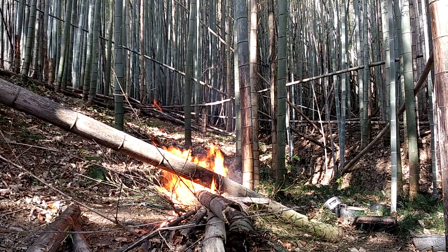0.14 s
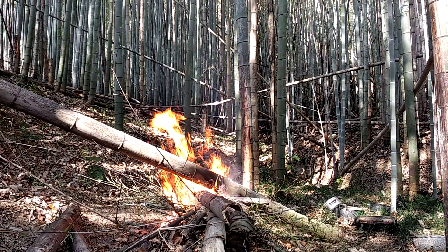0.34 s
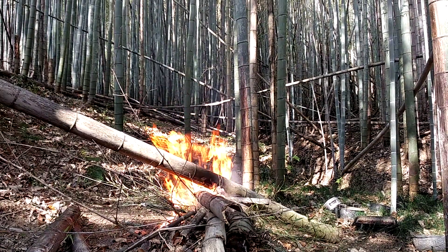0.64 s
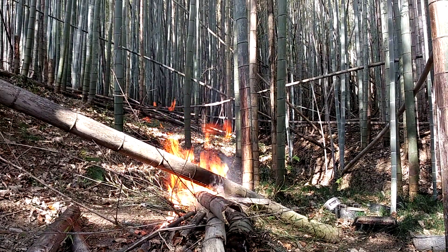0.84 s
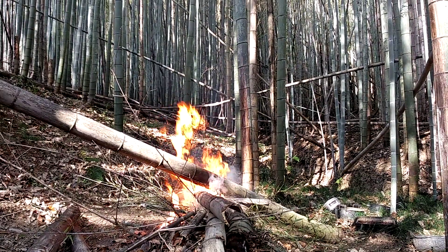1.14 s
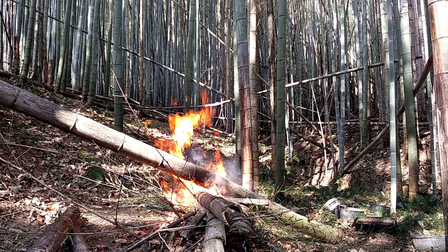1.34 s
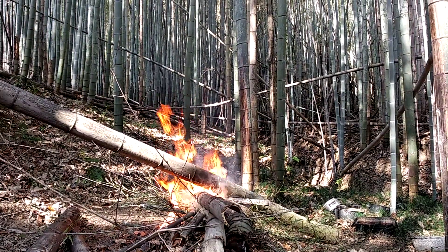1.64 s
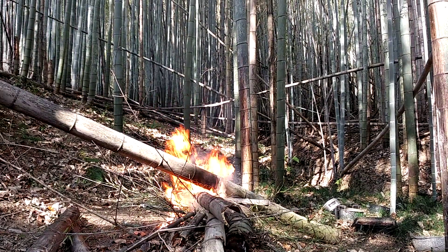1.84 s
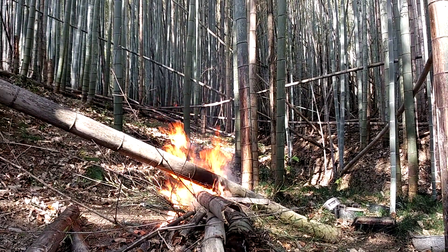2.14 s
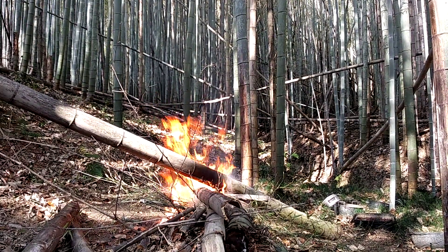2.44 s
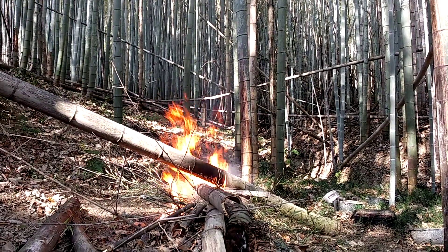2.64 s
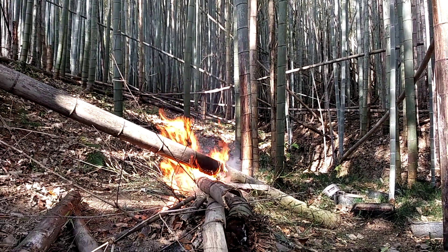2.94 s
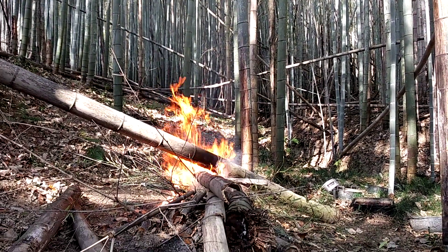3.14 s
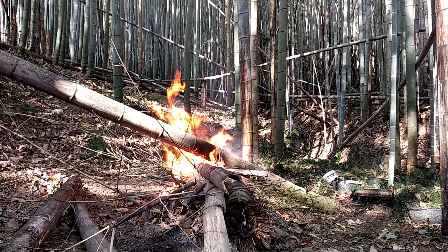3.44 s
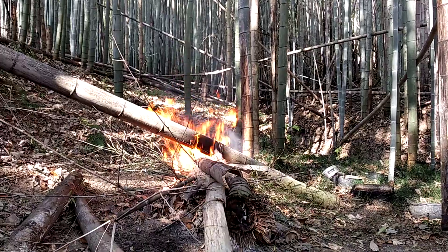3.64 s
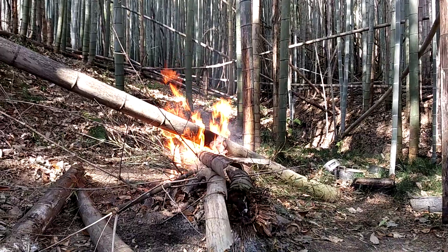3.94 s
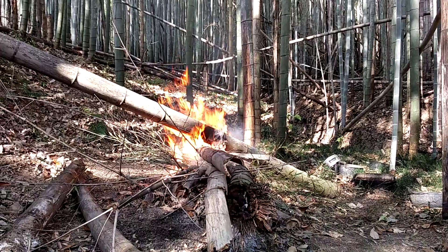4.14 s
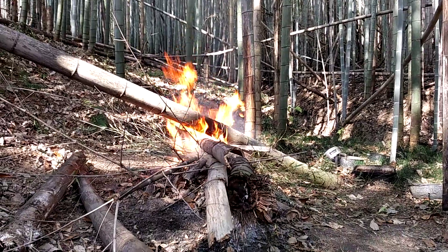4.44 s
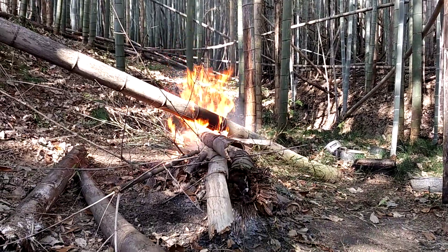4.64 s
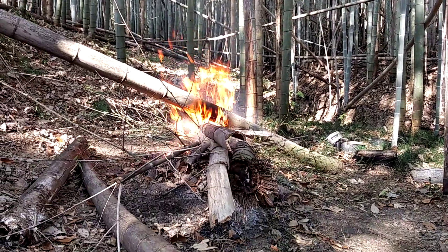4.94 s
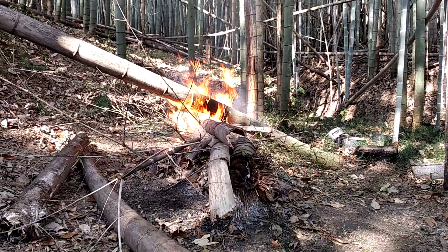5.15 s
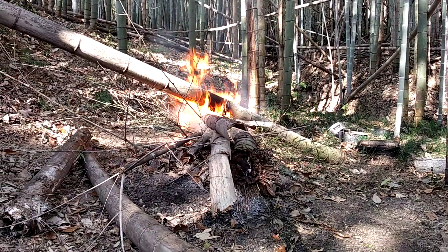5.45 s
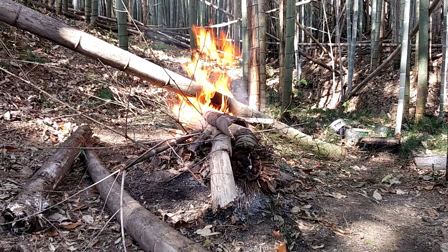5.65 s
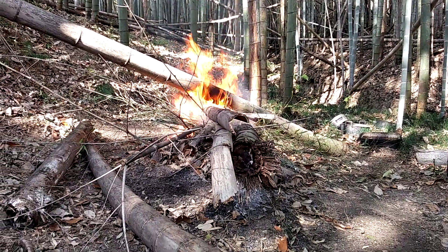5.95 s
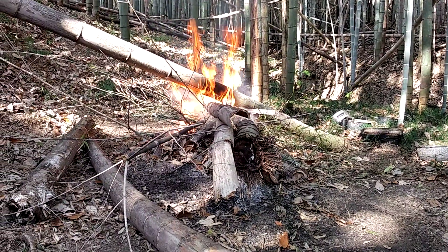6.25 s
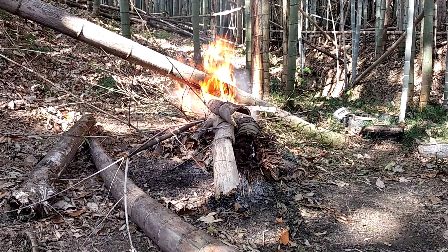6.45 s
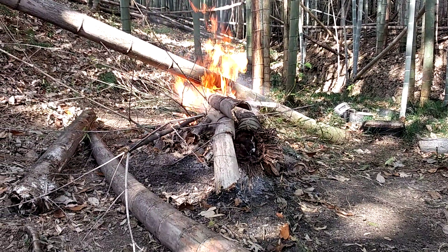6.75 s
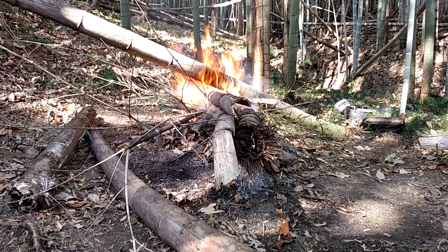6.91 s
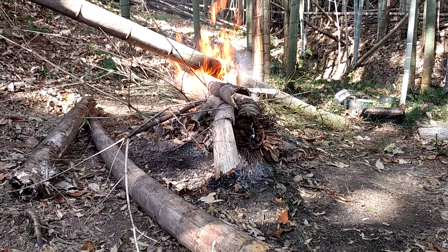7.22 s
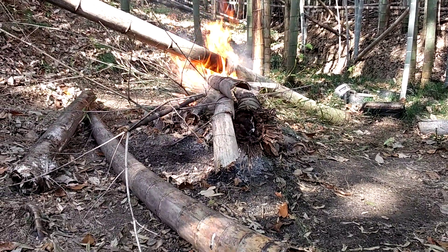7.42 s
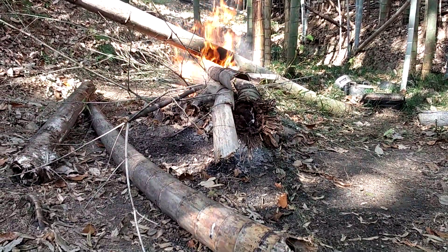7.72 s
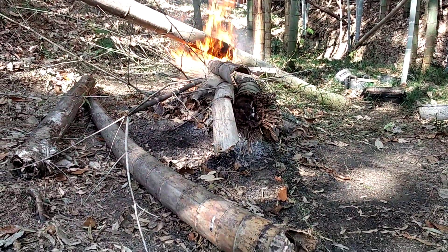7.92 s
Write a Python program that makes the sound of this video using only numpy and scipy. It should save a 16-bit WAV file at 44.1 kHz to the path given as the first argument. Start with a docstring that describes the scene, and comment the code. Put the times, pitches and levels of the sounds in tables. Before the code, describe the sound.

Close dry snaps, ticking embers and brief steam hisses over quiet rumbling flames outdoors, one hard bang near the start, a distant bird chirping.

```python
"""In a dense grove, a bonfire of bamboo poles burns a few metres away.
Flames rumble and gas hisses (shaped noise), while embers crackle and tick (tiny bursts and short tones).
Fibres snap in sharp pops (noise with a ring), splits let out spurts of steam (fading noise) and squeaks,
a thick cane thumps, and one sealed cane bursts (tones that die fast).
The standing stalks scatter the cracks as echoes, and a distant bird whistles three times (bent tones)."""
import sys
import numpy as np
from scipy import signal
from scipy.fft import rfft, irfft, next_fast_len
from scipy.io import wavfile
from scipy.ndimage import uniform_filter1d, minimum_filter1d

SR = 44100
rng = np.random.default_rng(int(sys.argv[2]) if len(sys.argv) > 2 else 0)


def generate_wav(sig):
    """Save sig (samples, or channels by samples) to the path in sys.argv[1] as 16-bit PCM at SR."""
    pcm = np.round(np.clip(np.atleast_2d(sig).T, -1, 1) * 32767).astype(np.int16)
    wavfile.write(sys.argv[1], SR, pcm)


N = 356239  # length of the scene in samples

# Bird whistles: (time [s], length [s], top pitch [Hz], level at the start [dB])
WHISTLES = [(2.335, 0.072, 4570, -45.5), (4.134, 0.092, 4630, -51), (6.396, 0.13, 4600, -50)]
# Every whistle climbs to its top, then hooks down: shares of the top pitch, and when the top comes (share of length)
CLIMB, HOOK, TOP_AT = 0.26, 0.107, 0.73
WHISTLE_ATTACK_S, WHISTLE_RELEASE_S, WHISTLE_SAG_DB_PER_S = 0.017, 0.01, -62

# Tone of the roaring flames: (frequency [Hz], relative level [dB])
ROAR_COLOUR = [(20, -48), (30, -31), (42, -7), (60, 0), (85, 1), (130, -2), (205, -6), (300, -18.5),
               (410, -18), (540, -31.5), (800, -49)]
# Tone of the escaping gas, before the canes colour it: (frequency [Hz], relative level [dB])
HISS_COLOUR = [(300, -8.5), (660, -3), (840, 0.5), (1100, -4.5), (1450, -7), (2100, -4.5), (3100, -7),
               (4300, 2), (5500, 1), (6200, -11), (7000, -10.5), (8900, -7), (12000, -11), (16000, -12.5)]
# Loudness of the roar and hiss, with the irregular wavering of their noise:
# (time [s], roar level [dB], hiss level before flicker [dB])
ROAR_AND_HISS_LEVELS = [(0.0, -48, -54), (0.99, -48.5, -53.5), (1.01, -46, -51), (1.6, -49, -54.5),
                        (1.64, -46.5, -55), (2.38, -48, -54), (2.92, -47.5, -52.5), (3.4, -44, -53.5),
                        (3.49, -52, -51), (3.53, -47, -53), (4.0, -49, -55), (4.72, -48, -52.5),
                        (4.77, -46, -52.5), (4.99, -49, -53.5), (5.26, -46, -53.5), (5.29, -49, -54.5),
                        (5.96, -46.5, -54), (8.08, -47.5, -53.5)]
# Resonances of the open canes: (frequency [Hz], width [Hz], level [dB])
HOLLOWS = [(834, 110, -12), (2086, 200, -6), (2763, 107, 2), (3360, 126, -3), (4820, 140, -12)]

# Frequency bands of snaps and crackle: (low edge [Hz], high edge [Hz])
SNAP_BANDS = [(250, 1150), (1300, 2500), (2650, 5500), (6600, 11000), (11000, 16500)]
# Relative level of the crackle in each of those bands [dB]
CRACKLE_BAND_DB = [-7.0, -6, -0.5, -7.0, -3.5]

# When the steam squeaks may begin: (earliest [s], latest [s])
SQUEAK_SPAN = (4.49, 4.69)
# Thin squeaks of steam forced through pores: (lowest start pitch [Hz], highest start pitch [Hz], level [dB])
SQUEAKS = (11100, 13400, -65)
# Steam from fresh splits: (time [s], level [dB], time to fall 60 dB [s], treble against body [dB])
SPURTS = [(.603, -48, .11, -18), (1.062, -34, 0.14, 3), (1.957, -38.5, 0.12, 1), (2.205, -45, 0.15, 4),
          (2.61, -34, 0.14, 6), (3.388, -37, 0.16, -21), (4.315, -42, 0.12, 0), (5.896, -41, 0.07, -9),
          (6.307, -40.5, 0.089, 1), (6.8, -49.5, 0.22, 4), (7.397, -45, 0.12, 7)]
# Tone of the steam, main part: (frequency [Hz], relative level [dB])
STEAM_BODY = [(200, -5), (800, -11), (1600, -8.5), (2800, -9), (4600, 3.5), (5600, 2), (6400, -12), (12000, -37)]
# Tone of the steam, treble part: (frequency [Hz], relative level [dB])
STEAM_TREBLE = [(4000, -30), (6200, -30), (7500, 3), (9200, 10.5), (11000, 3), (13000, 8), (16000, -5)]

# Dull thump of a thick cane: (level [dB], lowest [Hz], highest [Hz], time to fall 60 dB [s])
THUMP = (-33, 150, 518, 0.06)
THUMP_S = 3.387

# Snapping fibres: (time [s], level [dB], body below 2.5 kHz [dB], brightness above 6 kHz [dB],
# length [s], ringing pitch [Hz])
POPS = [(0.134, -38, -22, -8, 0.0032, 5500), (0.2545, -44.5, -0.5, -6, 0.0042, 4200),
        (0.327, -42.5, -4, -12, 0.0036, 5100), (0.497, -44.5, -11, -6, .0036, 4220),
        (.5626, -47, -5, -3, 0.0041, 5170), (.6013, -26, -1.5, -11, 0.0022, 4330),
        (.631, -48, 5, 4, .0047, 5120), (0.648, -43.5, -15, 3, 0.0021, 4630),
        (0.699, -46.5, -6, -8, .0036, 4500), (.7604, -39.5, -4.5, -6, 0.0041, 1970),
        (.902, -42.5, -8, -1, 0.0092, 4400), (0.968, -41, -19, -13, 0.0033, 4500),
        (0.985, -44.5, -14, 0, .0025, 4540), (1.036, -47.5, -1, 4, .0026, 4390),
        (1.0607, -27, -13, -3, 0.0027, 7730), (1.0637, -35, -11, 7.5, 0.0012, 12200),
        (1.076, -40, -9, 6, 0.0039, 7200), (1.0866, -39, -8, 0, .005, 4600),
        (1.308, -40.5, -8, -7, 0.0064, 5050), (1.3706, -46.5, -4, 0, 0.0028, 4970),
        (1.6306, -41, -10, -18, 0.002, 4440), (1.956, -29, -14, 4, 0.0029, 5330),
        (2.0358, -36.5, -13, 3.5, 0.0016, 4560), (2.203, -46.5, -1, 4, .006, 5300),
        (2.2133, -49, -10, 2, .004, 8030), (2.3146, -37, -10, -2, 0.0036, 2030),
        (2.3467, -44, -10, 6, 0.0018, 4000), (2.4159, -45, -13, 1, .0013, 8750),
        (2.465, -41.5, 0.5, -4, .0036, 4200), (2.6101, -37.5, -7.5, 1, .0036, 9400),
        (2.624, -35.5, -15, 4.5, 0.00078, 12000), (2.9615, -44, -1, -4, 0.0091, 4120),
        (2.978, -41, -15, -5, 0.0023, 4170), (3.008, -42.5, -18, -3, .0025, 4900),
        (3.0743, -43, 1, -2, 0.0072, 3950), (3.196, -41, -1, 2.5, 0.0071, 4110),
        (3.2575, -43, -12, 2, 0.0011, 4970), (3.3871, -28.5, 2, -4.5, 0.0026, 4260),
        (3.391, -34, -3, -9, 0.0045, 4080), (3.401, -36, -2, -6, .006, 2870),
        (3.444, -44, -3, -11, .0043, 4300), (3.4726, -26, -9, -5, 0.0036, 1860),
        (3.561, -42.5, -6, -6, .0056, 4570), (3.6258, -39, -2.5, -9, .0038, 4170),
        (3.79, -44, -4, -6, 0.0039, 4930), (3.824, -42.5, -4, -4, 0.003, 2230),
        (3.919, -42, -16, -4, .0023, 5070), (4.3126, -30.5, -6.5, 2, 0.0026, 4840),
        (4.3937, -42, 2, -12, 0.0047, 4180), (4.7714, -42.5, -11, -20, 0.0019, 4350),
        (4.843, -50.5, -12, 6, .0014, 2880), (4.977, -48.5, -15, 4.5, 0.0018, 4040),
        (5.201, -47, -5, 2, .0023, 2740), (5.3212, -48.5, -14, 5.5, 0.0044, 4290),
        (5.4992, -41.5, 1, -2, 0.0034, 4920), (5.8924, -37, -8, 2, .005, 4850),
        (6.305, -39, -16, -0.5, .0038, 9730), (6.321, -45, -11, 10, .0017, 4630),
        (6.4714, -40.5, -1.5, 5, 0.0096, 3570), (6.516, -41.5, -18, 0, 0.0029, 4200),
        (6.542, -51.5, 4, -10, 0.00074, 1500), (6.7997, -55, -8, 10, .0034, 12000),
        (6.834, -42.5, -5, 1.5, 0.016, 4080), (6.9284, -39, -7, -2.5, 0.0092, 4880),
        (7.079, -55.5, 8, -2, 0.00088, 1500), (7.2021, -46, -5, -19, .0034, 4780),
        (7.393, -42.5, -8, 5, 0.0046, 4530), (7.405, -46, -15, 1, .006, 10100),
        (7.497, -25, -10.5, -14.5, 0.0052, 2010), (7.6625, -45, -17, -3, 0.0041, 5000),
        (7.7604, -42.5, -16, -12, 0.0036, 4280), (7.792, -33, -12, -10.5, 0.008, 2150)]
# Typical faint snap: (level [dB], body [dB], brightness [dB], length [s], ringing pitch [Hz]).
# Its negative length makes a click whose ring swells until it is cut off.
FAINT_SNAP = (-48.5, -4, -2.5, -0.1, 4504)
# Colour shared by all snaps: the lowest and highest bands get an offset, the band that rings is lifted
BASS_DB, TOP_DB, RING_LIFT_DB = -3.5, -8, 6.5
BASS_PER_BODY = 1.3  # dB in the lowest band for each dB of body
TOP_PER_BRIGHTNESS = 1.4  # dB in the highest band for each dB of brightness

# The sealed cane that bursts: (time [s], level [dB], time the wall takes to tear [s])
BURST = (.6013, -10, 0.0022)
# Its ringing wall: (frequency [Hz], relative level [dB], time to fall 60 dB [s])
CANE_WALL = [(2115, -8.5, 0.0086), (2840, -4.5, 0.0062), (3400, 0, .005), (4100, -11, 0.0062),
             (4900, -12, 0.0057)]

LIMIT_DB, TOP_HZ = -10.3, 15800  # ceiling for loud peaks, highest pitch kept


def undb(db):
    """Turn decibels into a plain multiplier."""
    return 10 ** (np.asarray(db) / 20)


def unit(x):
    """Scale a sound to an average (rms) strength of 1."""
    return x / np.sqrt(np.mean(x ** 2))


def fade(t, t60):
    """Die away smoothly, down by 60 dB after t60 seconds."""
    return np.exp(-np.log(1000) * t / t60)


def add(out, s, x):
    """Mix x into out from time s on."""
    i = max(int(s * SR), 0)
    out[i:i + len(x)] += x[:len(out) - i]


def bandpass(lo_hz, hi_hz):
    """Make a filter that keeps only the pitches between two edges."""
    return signal.butter(3, [lo_hz, min(hi_hz, SR / 2 - 1)], "band", fs=SR, output="sos")


def coloured(points):
    """Noise of rms 1 whose spectrum follows the shape of the (Hz, dB) points."""
    hz, db = np.transpose(points)
    size = next_fast_len(N)
    f = np.maximum(np.fft.rfftfreq(size, 1 / SR), 1)
    gain = undb(np.interp(np.log(f), np.log(hz), db))
    spectrum = rfft(rng.standard_normal(size)) * gain
    return unit(irfft(spectrum, size)[:N])


def walk(rate):
    """A random curve of rms 1 that slides to a new value rate times a second."""
    k = int(SR / rate)
    held = np.repeat(rng.standard_normal(N // k + 1), k)
    return unit(uniform_filter1d(held, k)[:N])


def grove(x, t60, top_hz, rough):
    """Echoes from countless stalks: they build up within a few ms and then die away."""
    t = np.arange(SR) / SR
    stalks = rng.standard_normal(SR) * np.exp(rough * rng.standard_normal(SR))
    build_up = 1 - np.exp(-t / 0.0011)
    echo = signal.sosfilt(bandpass(300, top_hz), stalks * fade(t, t60) * build_up)
    return signal.fftconvolve(x, echo / np.linalg.norm(echo))[:N]


def ground(x, dip_hz, width_hz, depth):
    """The bounce off the leaf litter weakens a band in the low middle."""
    band = signal.lfilter(*signal.iirpeak(dip_hz, dip_hz / width_hz, fs=SR), x)
    return x - min(depth, 1) * band


def bird(waver):
    """A nearly pure whistle arches up, weakens and hooks down."""
    out = np.zeros(N)
    for s, length, top_hz, db in WHISTLES:
        t = np.arange(int(length * SR)) / SR
        past_top = t / length - TOP_AT
        climb = CLIMB * (past_top / TOP_AT) ** 2
        hook = HOOK * (past_top / (1 - TOP_AT)) ** 2
        drop = np.where(past_top < 0, climb, hook)
        pitch = top_hz * (1 - drop) * (1 + waver * walk(248)[:len(t)])
        attack = np.minimum(t / WHISTLE_ATTACK_S, 1) ** 2
        release = np.minimum((length - t) / WHISTLE_RELEASE_S, 1)
        tone = np.sqrt(2) * np.sin(2 * np.pi * np.cumsum(pitch) / SR)
        add(out, s, tone * attack * release * undb(db + WHISTLE_SAG_DB_PER_S * t))
    return out


def hollows(x):
    """The open canes in the fire add their resonances to a sound."""
    return x + sum(undb(db) * signal.lfilter(*signal.iirpeak(hz, hz / width, fs=SR), x)
                   for hz, width, db in HOLLOWS)


def flames(flicker_db):
    """Turbulent flames roar low while gas hisses out of the canes with a quick flicker."""
    s, *columns = np.transpose(ROAR_AND_HISS_LEVELS)
    roar_db, hiss_db = (np.interp(np.arange(N) / SR, s, column) for column in columns)
    roar = coloured(ROAR_COLOUR) * undb(roar_db)
    gas = unit(hollows(coloured(HISS_COLOUR)))
    return roar + gas * undb(hiss_db + flicker_db * walk(45))


def crackle(count, crackle_db, spread_db, colour_db, decay):
    """Many small snaps in the embers: most are faint, and each has its own colour."""
    when = rng.integers(0, N, count)
    size_db = spread_db * np.minimum(rng.exponential(size=count), 3)
    out = 0
    for (lo, hi), band_db in zip(SNAP_BANDS, CRACKLE_BAND_DB):
        kicks = np.zeros(N)
        kicks[when] = undb(size_db + band_db + colour_db * rng.standard_normal(count))
        # each kick starts a short burst of noise
        envelope = signal.lfilter([1], [1, -np.exp(-1 / (decay * SR))], kicks)
        bursts = signal.sosfilt(bandpass(lo, hi), envelope * unit(rng.standard_normal(N)))
        out = out + bursts * np.sqrt(SR / 2 / (hi - lo))  # make up for the width of the band
    return out * undb(crackle_db)


def ticks(count, tick_db, spread_db, centre_hz, octaves, decay):
    """Small splinters give way and ring briefly, each at its own pitch."""
    out, t = np.zeros(N), np.arange(SR // 50) / SR
    envelope = np.exp(-t / decay) * (1 - np.exp(-t / 0.00065))
    for when, size, pitch in rng.random((count, 3)):
        hz = centre_hz * 2 ** (octaves * (np.sqrt(pitch) - 2 / 3))  # high ones are the most common
        db = tick_db + spread_db * min(-np.log(size), 2.5)
        add(out, when * N / SR, undb(db) * np.sin(2 * np.pi * hz * t) * envelope)
    return out


def squeaks(count, glide):
    """Steam forced through pores whistles briefly and very high, sliding a little up or down."""
    (start, end), (lo_hz, hi_hz, db) = SQUEAK_SPAN, SQUEAKS
    out, t = np.zeros(N), np.arange(SR // 40) / SR
    for when, pitch, slope in rng.random((count, 3)):
        hz = (lo_hz + pitch * (hi_hz - lo_hz)) * (1 + glide * (slope - 0.5) * t / t[-1])
        tone = np.sin(2 * np.pi * np.cumsum(hz) / SR)
        add(out, start + when * (end - start), undb(db) * np.hanning(len(t)) * tone)
    return out


def spurts(linger_db, linger_t60):
    """Steam leaves each split in a sputtering hiss that fades as the pressure drops, then lingers faintly."""
    out, t = np.zeros(N), np.arange(SR // 2) / SR
    body, treble = coloured(STEAM_BODY), coloured(STEAM_TREBLE)
    sputter = undb(3.7 * walk(500))
    linger = undb(linger_db) * fade(t, linger_t60)
    onset = 1 - np.exp(-t / 0.00044)
    for s, db, t60, treble_db in SPURTS:
        i = int(s * SR)
        steam = (body + undb(treble_db) * treble) * sputter
        jet = unit(steam[i:i + len(t)])
        pressure = (fade(t, t60) + linger) * onset
        add(out, s, jet * undb(db) * pressure)
    return out


def thump():
    """The body of a thick cane shudders for a moment as it splits."""
    db, lo_hz, hi_hz, t60 = THUMP
    out, t = np.zeros(N), np.arange(SR // 4) / SR
    shudder = unit(signal.sosfilt(bandpass(lo_hz, hi_hz), rng.standard_normal(len(t))))
    add(out, THUMP_S, shudder * undb(db) * fade(t, t60))
    return out


def snap(filters, db, body_db, bright_db, length, hz, rough=0.3, ring_db=2, ring_cycles=2.4):
    """Tiny fractures ring the piece that breaks; thick pieces have body, thin ones are bright."""
    t = np.arange(SR // 25) / SR
    fractures = rng.standard_normal(len(t)) * np.exp(rough * rng.standard_normal(len(t)))
    tear = fractures * np.exp(-t / max(length, 1 / SR))
    ring = unit(np.sin(2 * np.pi * hz * t) * np.exp(-t / (length / 2 + ring_cycles / hz)))
    parts = [unit(signal.sosfilt(sos, tear)) for sos in filters]
    # the ring joins the band nearest to its pitch
    ringing = np.argmin(np.abs(np.log(SNAP_BANDS).mean(axis=1) - np.log(hz)))
    parts[ringing] = undb(RING_LIFT_DB) * unit(parts[ringing] + undb(ring_db) * ring)
    bass_db = BASS_PER_BODY * body_db + BASS_DB
    top_db = TOP_PER_BRIGHTNESS * bright_db + TOP_DB
    colour = np.array([bass_db, body_db, 0, bright_db, top_db])
    # the level counts a band's energy as if gathered into 1 ms
    gathered = np.sqrt(SR / 1000 / len(t))
    return gathered * undb(db + colour) @ np.array(parts)


def pops(count, spread_db, octaves):
    """Fibres break in the listed snaps, with faint ones scattered at random between them."""
    out, filters = np.zeros(N), [bandpass(lo, hi) for lo, hi in SNAP_BANDS]
    for s, *piece in POPS:
        add(out, s, snap(filters, *piece))
    db, body_db, bright_db, length, hz = FAINT_SNAP
    for when, size, body, bright, pitch in rng.uniform(-1, 1, (count, 5)):
        faint = snap(filters, db + spread_db * size, body_db + spread_db * body,
                     bright_db + spread_db * bright, length, hz * 2 ** (octaves * pitch))
        add(out, (when + 1) / 2 * N / SR, faint)
    return out


def burst():
    """The cane wall is driven while it tears, then its ringing tones die fast."""
    s, db, tearing = BURST
    out, t = np.zeros(N), np.arange(SR // 8) / SR
    since_torn = np.maximum(t - tearing, 0)
    wall = sum(undb(mode_db) * fade(since_torn, t60) * np.sin(2 * np.pi * (hz * t + rng.random()))
               for hz, mode_db, t60 in CANE_WALL)
    add(out, s, wall * undb(db) * (1 - np.exp(-t / 0.00026)))
    return out


def scene():
    """The fire is near and fairly dry; the bird is deep among the stalks."""
    whistle = bird(waver=0.009)
    call = whistle + undb(-3.0) * grove(whistle, t60=0.88, top_hz=9000, rough=0.37)
    fire = flames(flicker_db=1.2)
    embers = crackle(count=900, crackle_db=-66.5, spread_db=3.5, colour_db=4.5, decay=0.0018)
    embers = embers + ticks(count=260, tick_db=-58.0, spread_db=6.0, centre_hz=3215, octaves=2.17, decay=0.0019)
    steam = spurts(linger_db=-13.5, linger_t60=0.36) + squeaks(count=26, glide=0.06)
    snaps = pops(count=30, spread_db=4, octaves=0.384)
    snaps = ground(snaps + hollows(embers), dip_hz=690, width_hz=140, depth=0.69)
    bang = burst()
    spread = snaps + undb(-16) * bang  # the burst cane faces the listener and sends less into the grove
    near = undb(-13) * grove(spread, t60=0.085, top_hz=12700, rough=0.86)
    far = undb(-18) * grove(spread, t60=0.83, top_hz=11000, rough=0.31)
    return (call + fire + steam + thump() + snaps + bang + near + far)[None]


def record(dry):
    """A fast limiter holds down the loudest peaks, then the very top is cut."""
    size = SR // 1000  # about 1 ms
    allowed = undb(LIMIT_DB) / np.maximum(np.abs(dry), undb(LIMIT_DB))
    gain = uniform_filter1d(minimum_filter1d(allowed, size), size)
    top_cut = signal.ellip(10, 0.2, 70, TOP_HZ, fs=SR, output="sos")
    return signal.sosfilt(top_cut, dry * gain)


dry = scene()
out = record(dry)
generate_wav(out)
```